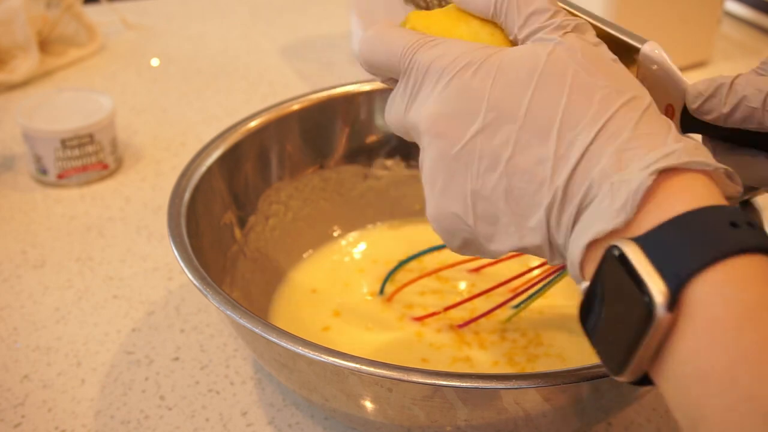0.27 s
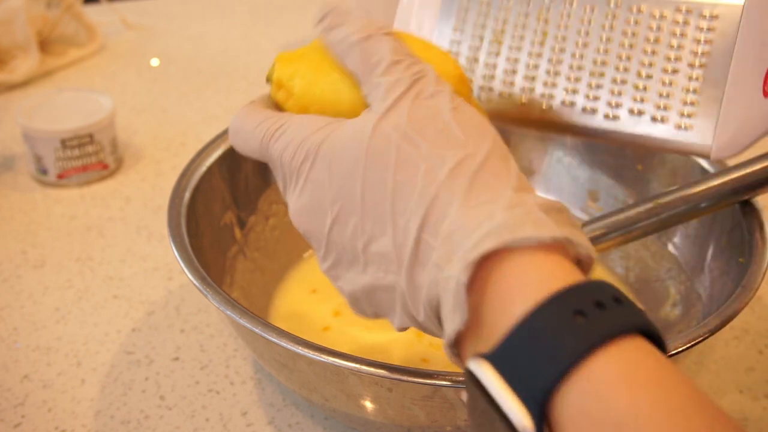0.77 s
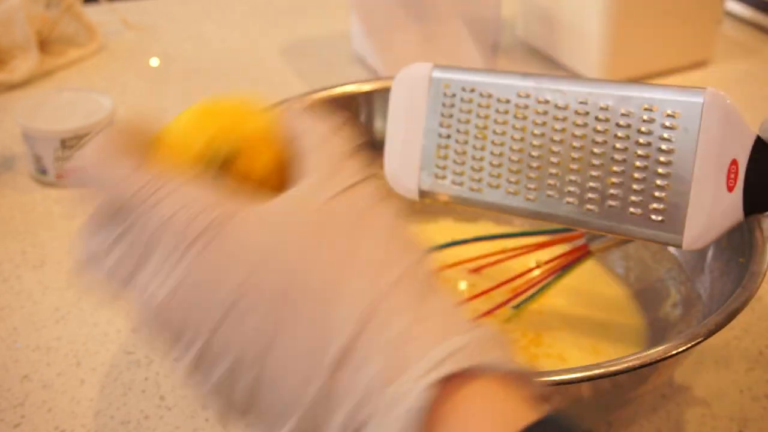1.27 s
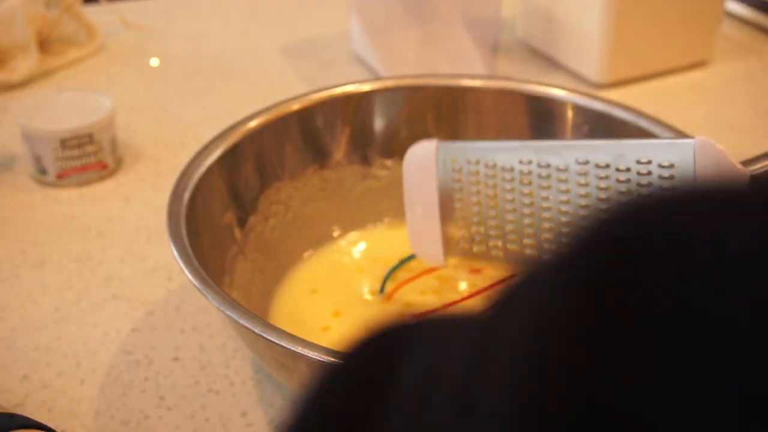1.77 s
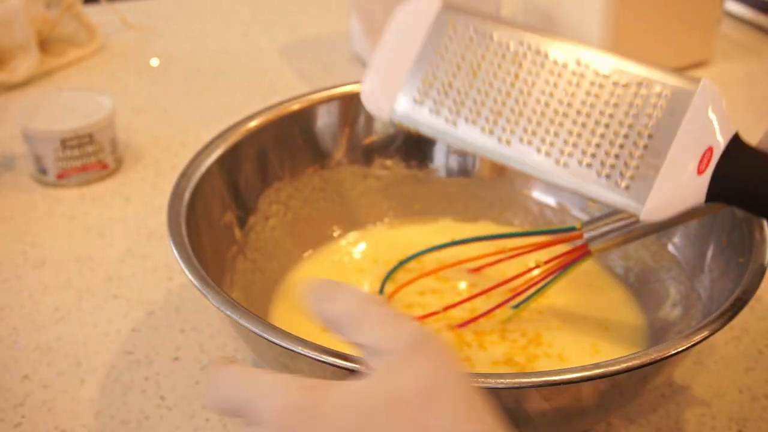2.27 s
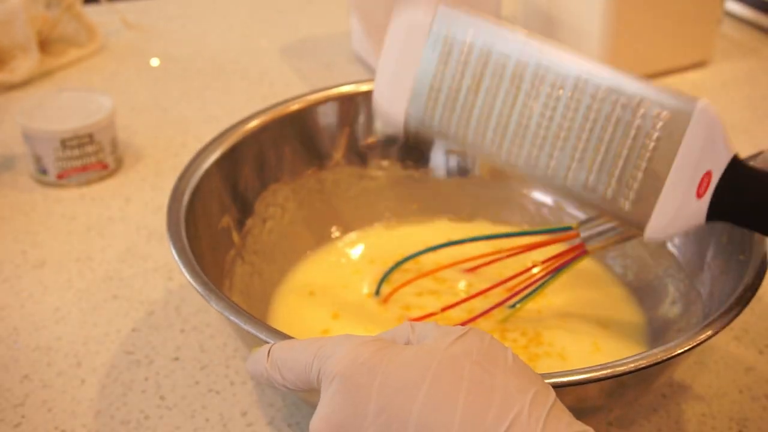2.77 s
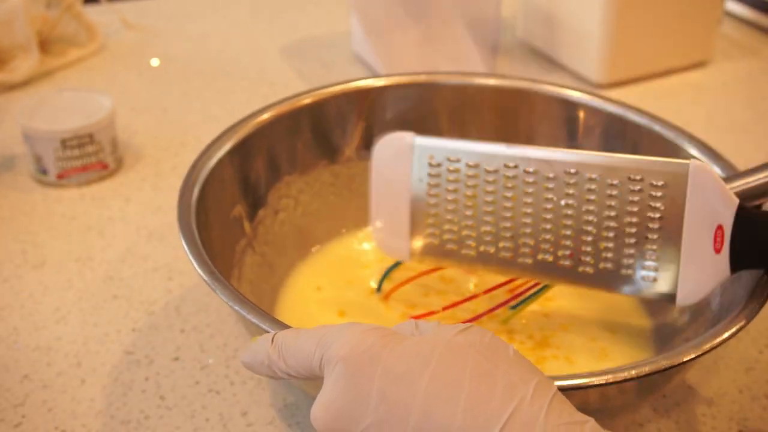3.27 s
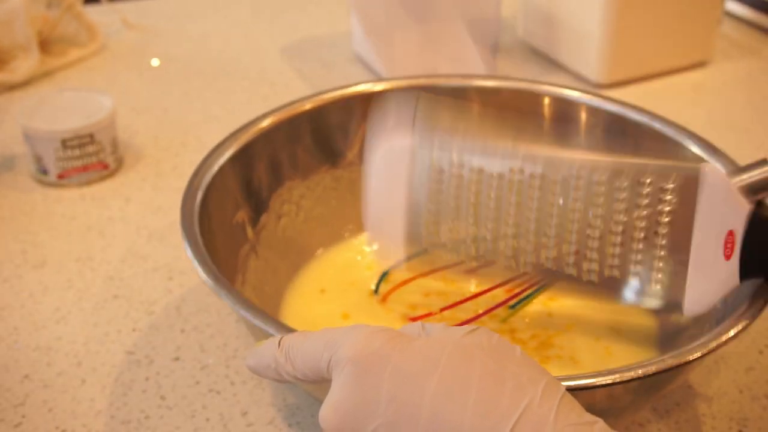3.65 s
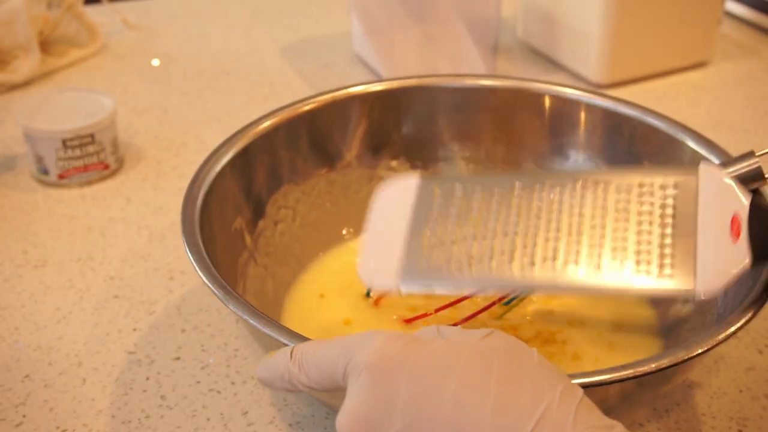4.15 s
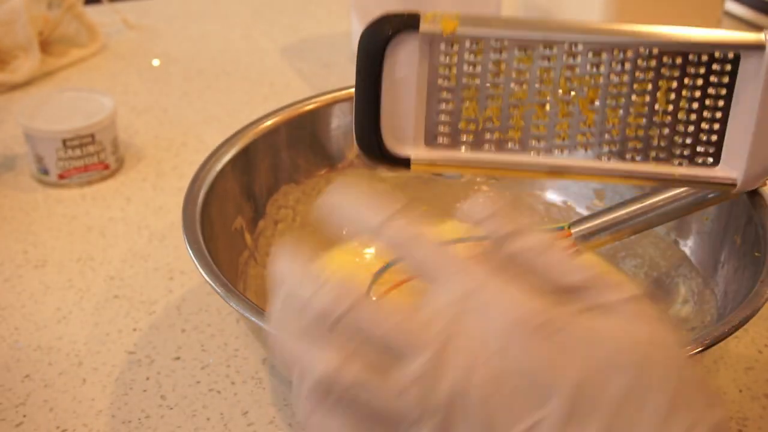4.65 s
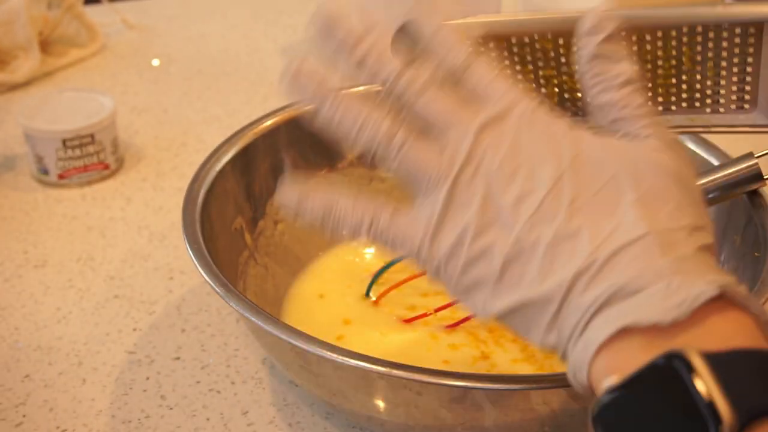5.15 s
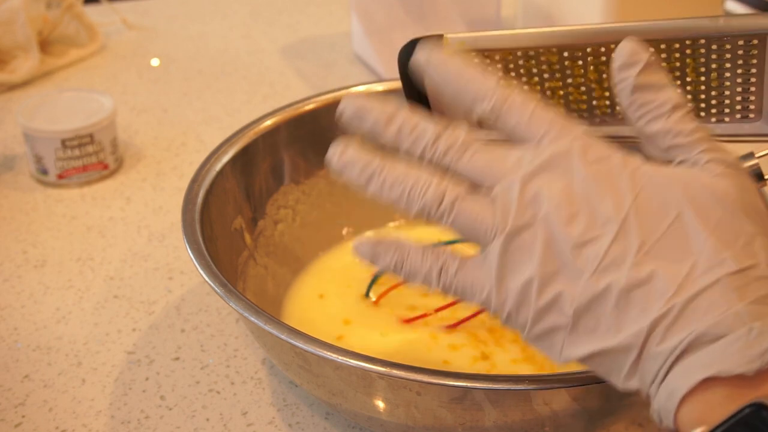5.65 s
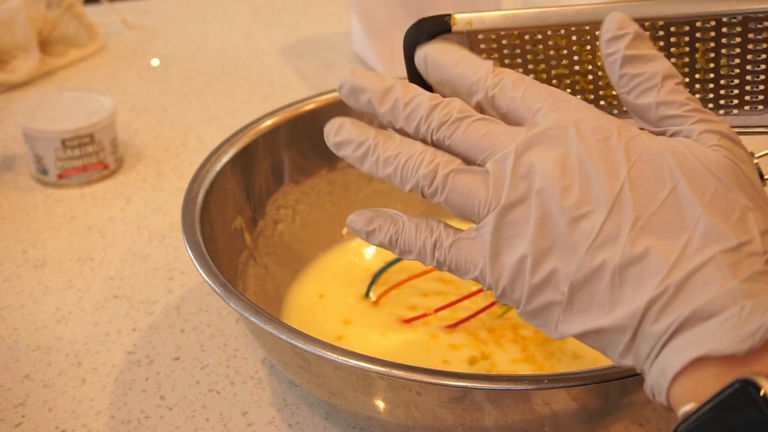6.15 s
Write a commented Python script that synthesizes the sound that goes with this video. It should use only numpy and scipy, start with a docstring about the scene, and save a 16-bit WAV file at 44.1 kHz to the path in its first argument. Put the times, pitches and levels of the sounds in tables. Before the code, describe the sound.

Four quick zesting rasps on a metal grater, soft glove rustles, then eight loud ringing knocks on a steel bowl with whisk clanks, then faint taps.

```python
"""Four quick rasps, light rustles and taps, eight ringing knocks with clanks, then more rustles and taps; room tone.
A lemon is rasped over a flat steel grater above a steel mixing bowl in a kitchen: bunched noise grains.
The grater scrapes along the rim, then knocks on it to shed the zest: force pulses excite bowl and worktop modes.
Each knock throws up the whisk lying in the bowl, which clanks as it lands: noise crack plus handle modes.
Gloved hands rustle and tap on a second grater: shaped noise through blade resonances."""
import sys
import numpy as np
from scipy import signal
from scipy.fft import rfft, irfft
from scipy.io import wavfile
from scipy.ndimage import uniform_filter1d

SR = 44100
rng = np.random.default_rng(int(sys.argv[2]) if len(sys.argv) > 2 else 0)


def master(y):
    """Save y as 16-bit WAV."""
    cut = np.clip(np.atleast_2d(y).T, -1, 1)
    pcm = np.round(cut * 32767)  # scale
    wavfile.write(sys.argv[1], SR, pcm.astype(np.int16))


N = 283122
TIME = np.arange(N) / SR
CUTOFF_HZ = 15900

# grater on the rim: peak t/s, relative level/dB, contact pitch f/Hz, whisk flight/s, bowl ring at landing/dB
KNOCKS = [(2.5316, -15, 634, 0.0075, 7), (2.6742, -12, 645, 0.011, 8), (3.089, -9, 553, 0.023, 8.5),
          (3.297, -6.5, 580, .0221, 3.5), (3.502, -7, 577, .0168, 5), (3.6989, -6, 592, .0185, -0.5),
          (3.8905, -4.5, 620, .0194, 5.5), (4.1084, -5, 665, 0.013, 4.5)]
# whisk handle modes: f/Hz, relative level/dB, t60/s
WHISK = [(1550, -12, .05), (2095, -9, .06), (2250, -10, .06), (2760, -9, .06), (3291, 0, .07),
         (3390, -9, .06), (4035, -12, .08), (4700, -16, .08), (6150, -16, .1)]
# glove friction spectrum: f/Hz, relative density/dB per Hz
GLOVE = [(1000, -6), (1800, -9.5), (2400, -5), (4000, -1.5), (5200, -1), (7200, -1.5), (12000, 0),
         (15800, -5.5)]
# diffuse sound: f/Hz, left-right correlation/1
LIKENESS = [(100, .997), (300, .95), (600, .76), (1000, .72), (2200, .55), (4500, .05), (14000, .25)]


def from_db(db):
    """dB to amplitude."""
    return 10 ** (np.asarray(db) / 20)


def at_hz(points, hz):
    """Read a table on a log-frequency axis."""
    table = np.array(points)
    return np.interp(np.log(np.maximum(hz, 1)), np.log(table[:, 0]), table[:, 1])


def coloured(x, spectrum):
    """Shape by a spectrum; white input keeps its power."""
    size = x.shape[-1]
    gain = from_db(at_hz(spectrum, np.fft.rfftfreq(size, 1 / SR)))
    return irfft(rfft(x) * gain / np.sqrt(np.mean(gain ** 2)), size)


def diffuse(size):
    """White stereo noise, alike in the bass and unlike in the treble."""
    mid, side = rfft(rng.standard_normal((2, size)))
    alike = np.clip(at_hz(LIKENESS, np.fft.rfftfreq(size, 1 / SR)), -.999, .999)
    mid = np.sqrt((1 + alike) / 2) * mid
    side = np.sqrt((1 - alike) / 2) * side
    return irfft(mid + side * [[1], [-1]], size)


def fade(t, t60):
    """Exponential decay, -60 dB at t60."""
    return np.exp(-np.log(1000) * t / t60)


def dying_noise(t60s, spectrum=None):
    """One second of diffuse noise, each frequency band dying at its own pace; mean channel energy 1."""
    noise = diffuse(SR)
    if spectrum is not None:
        noise = coloured(noise, spectrum)
    bins, hz, out = rfft(noise), np.fft.rfftfreq(SR, 1 / SR), 0
    edges_hz = np.r_[0, np.geomspace(125, SR / 2, 9)]
    for low, high in zip(edges_hz, edges_hz[1:]):
        band = irfft(bins * (hz >= low) * (hz < high), SR)
        out = out + band * fade(TIME[:SR], at_hz(t60s, (low + high) / 2))
    return out / np.sqrt(np.sum(out ** 2) / 2)


def add(track, s, sound):
    """Mix a sound in from time s on."""
    start = round(s * SR)
    track[..., start:start + sound.shape[-1]] += sound[..., :N - start]


def clicks(times_s, levels_db):
    """One-sample impulses."""
    track = np.zeros(N)
    track[np.round(np.asarray(times_s) * SR).astype(int)] = from_db(levels_db)
    return track


def ring(x, hz, t60):
    """A unit click sets a decaying sine of initial height 1 ringing."""
    r, w = fade(1 / SR, t60), 2 * np.pi * hz / SR
    return signal.lfilter([0, np.sin(w)], [1, -2 * r * np.cos(w), r * r], x + 1e-18)


def convolve(x, response):
    """Convolve per channel, cut to N samples."""
    return signal.fftconvolve(np.atleast_2d(x), np.atleast_2d(response), axes=-1)[:, :N]


def grains(per_s, spread_db, width):
    """Tiny snaps of uneven size and sign, each with its own stereo balance; rms 1."""
    sizes = from_db(spread_db * np.minimum(rng.exponential(1, N), 4)) * rng.choice([-1, 1], N)
    struck = rng.random(N) < per_s / SR
    balance = 1 + width * rng.standard_normal(N) * [[1], [-1]]
    snaps = sizes * struck * balance
    return snaps / snaps.std()


def rub(table, grit, rise_share, resonance_db, width_hz):
    """Each stroke swells and fades as a skewed bell; the place of contact picks a blade resonance."""
    # table: peak t/s, rise + fall sigma/s, relative level/dB, resonance f/Hz
    out, share = np.zeros((2, N)), np.clip(rise_share, .01, .99)
    for s, length_s, level_db, hz in table:
        near = np.abs(TIME - s) < .25
        t = TIME[near] - s
        sigma_s = length_s * np.where(t < 0, share, 1 - share)
        stroke = grit[:, near] * from_db(level_db) * np.exp(-.5 * (t / sigma_s) ** 2)
        b, a = signal.iirpeak(min(hz, CUTOFF_HZ), hz / width_hz, fs=SR)
        out[:, near] += stroke + from_db(resonance_db) * signal.lfilter(b, a, stroke)
    return out


def room_tone(level_db=-54):
    """Steady diffuse noise, strongest in the bass."""
    # f/Hz, relative density/dB per Hz
    air_spectrum = [(15, -13), (25, -4), (59, -7), (76, -5), (107, -7), (174, 0.5), (205, -8), (316, -2),
                    (342, -5), (654, -14), (834, -18), (2660, -25.5), (3300, -22.5), (4100, -23),
                    (15800, -25.5)]
    return from_db(level_db) * coloured(diffuse(N), air_spectrum)


def zesting(rise_share=.6):
    """Teeth tear the peel in thousands of small snaps, bunched as each row of teeth bites."""
    # lemon strokes: peak t/s, rise + fall sigma/s, relative level/dB, blade resonance f/Hz
    strokes = [(.008, 0.053, -31, 2290), (.140, 0.065, -30.5, 2750), (.283, 0.049, -30, 2170),
               (.442, 0.091, -30, 3400)]
    # f/Hz, relative density/dB per Hz
    rasp_spectrum = [(200, -17), (420, -16), (800, -12), (1050, -6.5), (1500, -10.5), (2050, -1.5),
                     (3500, -1.5), (4800, -5.5), (6500, -5), (9400, -6.5), (10500, -4), (12700, -3.5),
                     (15800, -9.5)]
    bites = uniform_filter1d(rng.standard_normal(N), size=130)
    bite_gain = from_db(1.35 * bites / bites.std())
    grit = coloured(grains(per_s=6000, spread_db=0.5, width=0.5) * bite_gain, rasp_spectrum)
    return from_db(-0.5) * rub(strokes, grit, rise_share, resonance_db=-5.5, width_hz=290)


def reverberation(source):
    """The kitchen returns a mono sum as a diffuse tail that builds up and dies, the treble faster."""
    # f/Hz, t60/s
    room_t60 = [(100, 0.99), (1000, 0.7), (4000, 0.56), (14000, 0.42)]
    tail = dying_noise(room_t60) * (1 - fade(TIME[:SR], t60=0.11))
    return convolve(source.mean(axis=0), tail)


def hands(crinkles_per_s=49, crinkle_db=-7, rise_share=0.2, arch=0.45):
    """Gloves slide and crinkle over the grater, whose blade rings faintly; speed sets the level."""
    # slides: start t/s, length/s, relative hiss level/dB, relative blade level/dB
    glove_moves = [(.55, 0.66, -56, -68.5), (1.28, 0.66, -55, -61), (1.9, 0.86, -53, -67.5),
                   (4.513, 0.52, -50, -67)]
    grit = coloured(grains(per_s=5500, spread_db=4.0, width=1.0), GLOVE)
    snap_t = TIME[:SR // 100]
    snap = rng.standard_normal(SR // 100) * fade(snap_t, t60=0.0094)
    crinkles = coloured(convolve(grains(crinkles_per_s, spread_db=2.5, width=0.8), snap), GLOVE)
    blade = signal.lfilter(*signal.iirpeak(2350, 7.0, fs=SR), grit)
    blade = blade / blade.std()
    glove = grit + from_db(crinkle_db) * crinkles / crinkles.std()
    out = np.zeros((2, N))
    for s, length_s, hiss_db, blade_db in glove_moves:
        # lower arch: more even speed
        speed = np.interp((TIME - s) / length_s, [0, rise_share, 1], [0, 1, 0]) ** arch
        out += speed * (from_db(hiss_db) * glove + from_db(blade_db) * blade)
    return from_db(-1) * out


def fingers(wipe_rise_share=0.52, flick_rise_share=0.064, tap_rise_share=0.35, flick_hz=4500, tap_s=.003):
    """Fingers wipe, flick zest off and tap the grater: friction noise in short strokes of differing skew."""
    # peak t/s, rise + fall sigma/s, relative level/dB, resonance f/Hz
    wipe_table = [(1.39, .06, -55.5, 2500), (2.295, .034, -54, 7940), (5.16, 0.08, -53, 12000),
                  (5.208, 0.019, -54, 4400)]
    # peak t/s, rise + fall sigma/s, relative level/dB
    flick_table = [(5.493, 0.023, -52.5), (5.879, .029, -44)]
    # peak t/s, relative level/dB, resonance f/Hz
    tap_table = [(0.965, -52.5, 4470), (1.768, -50, 4800), (4.678, -47, 4800), (4.821, -49, 9100),
                 (4.898, -51.5, 6760), (5.004, -53, 6000), (5.699, -52, 3930), (6.369, -50, 4060)]
    friction = coloured(diffuse(N), GLOVE)
    flick_strokes = [(*flick, flick_hz) for flick in flick_table]
    tap_strokes = [(s, tap_s, level_db, hz) for s, level_db, hz in tap_table]
    wipes = rub(wipe_table, friction, wipe_rise_share, resonance_db=1.0, width_hz=3100)
    flicks = rub(flick_strokes, friction, flick_rise_share, resonance_db=3, width_hz=1100)
    taps = rub(tap_strokes, friction, tap_rise_share, resonance_db=5, width_hz=1900)
    return from_db(1.0) * (wipes + flicks + taps)


def bumps():
    """Dull handling bumps, short low rings, reach the microphone through its stand, not the room."""
    # t/s, level/dB
    bump_table = [(1.9088, -34.5), (1.9194, -36.5), (1.9611, -35.5)]
    return ring(clicks(*np.transpose(bump_table)), hz=97, t60=0.085)


def slide(length_s=0.067, final_db=-41.5, swell_db=11.5):
    """The grater scrapes ever harder along the rim up to the first knock; the whisk handle sings."""
    friction = diffuse(N)
    singing = sum(from_db(db) * ring(friction, hz, t60) for hz, db, t60 in WHISK)
    to_go = (KNOCKS[0][0] - TIME) / length_s
    level = from_db(final_db - swell_db * np.clip(to_go, 0, 1))
    return singing / singing.std() * level * (to_go > 0) * (to_go < 1)


def knocks(buzz_db=-25, buzz_t60=.05, tick_lag_s=0.0061, tick_db=-23, cushion_hz=1500):
    """A cushioned blow radiates its bell-shaped force's second derivative; the thin blade buzzes and ticks."""
    # f/Hz, relative density/dB per Hz
    buzz_spectrum = [(500, -37), (2000, -18), (3300, -16.0), (4200, -16.5), (15000, -27)]
    out, thuds, t = np.zeros((2, N)), np.zeros(N), TIME[:SR // 20]
    for s, level_db, hz, _, _ in KNOCKS:
        u = (np.pi * hz * (TIME - s)) ** 2
        thuds += from_db(level_db) * (2 * u - 1) * np.exp(-u)
        buzz = coloured(diffuse(len(t)), buzz_spectrum) * fade(t, buzz_t60)
        tick = diffuse(len(t)) * fade(t, t60=0.035)
        add(out, s, from_db(level_db + buzz_db) * buzz)
        add(out, s + tick_lag_s, from_db(level_db + tick_db) * tick)
    return out + signal.sosfilt(signal.butter(3, cushion_hz, fs=SR, output="sos"), thuds)


def pushes(push_db=-26.5, push_hz=584):
    """Momentum of each knock in dB: a duller contact lasts longer and pushes more."""
    _, level_db, hz, _, _ = np.transpose(KNOCKS)
    return level_db + push_db - 60 * np.log10(hz / push_hz)


def swing(swing_db=28.0, landed_t60=.011, build_t60=0.0262, lag_s=0.00018):
    """A knock throws the whisk up; the bowl swings freely until the whisk lands and damps it."""
    # free bowl modes: f/Hz, relative level/dB, t60/s
    swing_modes = [(154.5, -25.5, 0.164), (272, -13.5, 0.04), (361, -29.5, 0.05), (484, -5.5, 0.028),
                   (644.5, -10.5, 0.093), (742, -21, 0.12)]
    out, t, free = np.zeros((2, N)), TIME[:SR // 10], 0
    for k, (hz, db, t60) in enumerate(swing_modes):
        lag = (-1) ** k * lag_s * np.array([[1], [-1]])   # alternate modes lead on opposite sides
        free = free - from_db(db) * np.cos(2 * np.pi * hz * (t + lag)) * fade(t, t60)
    free = free * (1 - fade(t, build_t60)) ** 2
    for (s, _, _, flight_s, _), push_db in zip(KNOCKS, pushes()):
        damping = fade(np.maximum(t - flight_s, 0), landed_t60)
        add(out, s, from_db(push_db + swing_db) * free * damping)
    return out


def counter():
    """Knocks set the worktop booming; its close modes start in opposition, so the boom swells after each blow."""
    # worktop modes: f/Hz, relative level/dB, t60/s
    worktop_modes = [(64.8, 6, 0.61), (71.5, 6.5, 0.72), (90.5, 5, 0.5)]
    push = clicks(np.array(KNOCKS)[:, 0], pushes())
    boom = 0
    for k, (hz, db, t60) in enumerate(worktop_modes):
        boom = boom + (-1) ** k * from_db(db) * ring(push, hz, t60)
    return signal.sosfilt(signal.butter(2, 45, "high", fs=SR, output="sos"), boom)


def whisk_falls(landing_db=-13.5, usual_flight_s=0.019, db_per_doubling=3, rebound_ring_db=4):
    """The whisk lands after every knock, harder after a longer flight, and rebounds after the later ones."""
    # t/s, relative strength/dB
    rebounds = [(3.171, -18), (3.386, -14), (3.5895, -15.5), (3.787, -17), (3.986, -24), (4.1934, -30)]
    falls = []   # t/s, strength/dB, bowl ring/dB
    for s, _, _, flight_s, ring_db in KNOCKS:
        strength_db = landing_db + db_per_doubling * np.log2(flight_s / usual_flight_s)
        falls.append((s + flight_s, strength_db, ring_db))
    return np.array(falls + [(s, level_db, rebound_ring_db) for s, level_db in rebounds])


def bowl(soft_hz=900, knock_db=15, clank_db=18, scatter_db=4.0, split=0.003):
    """Soft knocks favour low modes, hard clanks high ones; a round bowl's modes come in close, beating pairs."""
    # f/Hz, relative level/dB
    bowl_modes = [(129, -46.5), (148, -53), (252, -53.5), (281, -48), (386, -53.5), (506, -55.5),
                  (642, -60), (760, -54), (976, -48.5), (1040, -57.5), (1164, -61), (1549, -52.5),
                  (1698, -62.5), (1910, -45), (1965, -57), (2095, -41.5), (2239, -40.5), (2390, -45.5),
                  (2536, -50), (2650, -43.5), (2709, -43), (2784, -59.5), (3291, -58), (3828, -70.5),
                  (4037, -60.5), (4694, -60), (5270, -61), (5970, -63.5), (6165, -75), (6438, -63.5)]
    # f/Hz, t60/s
    bowl_t60 = [(130, 0.58), (500, 1), (1200, 0.66), (2200, 0.48), (3300, 0.73), (6400, 0.34)]
    knock_s, knock_level, *_ = np.transpose(KNOCKS)
    clank_s, clank_level, ring_db = whisk_falls().T
    blow_s = np.r_[knock_s, clank_s]
    out = np.zeros((2, N))
    for k, (hz, mode_db) in enumerate(bowl_modes):
        hardness_db = 40 * np.log10(hz / soft_hz)
        knock_levels = knock_level + knock_db - max(hardness_db, 0)
        clank_levels = clank_level + ring_db + clank_db + min(hardness_db, 0)
        levels = np.r_[knock_levels, clank_levels]
        lean = np.sqrt(np.clip(1 - at_hz(LIKENESS, hz), 0, 1)) / 2
        for twin in (-1, 1):
            blows = clicks(blow_s, levels + mode_db + scatter_db * rng.standard_normal(len(levels)))
            tone = ring(blows, hz * (1 + twin * split / 2), at_hz(bowl_t60, hz))
            out += (-1) ** k * tone / 2 * (1 + twin * lean * np.array([[1], [-1]]))
    return out


def wash(soft_hz=1000, hard_hz=700, knock_db=15.5, clank_db=11):
    """The bowl's many weaker modes blur into a dying wash, darker from knocks than from clanks."""
    # f/Hz, relative density/dB per Hz
    wash_spectrum = [(100, -4), (280, -1.5), (700, -12.5), (1050, 2.5), (1300, -2.5), (1550, -5.5),
                     (1800, -8.5), (2200, -0.5), (2900, -10), (3700, -9), (5200, -17), (6500, -12),
                     (7500, -20), (15500, -30)]
    # f/Hz, t60/s
    wash_t60 = [(100, 0.74), (350, 0.81), (920, 0.87), (2400, 0.74), (6400, 1), (14000, 0.18)]
    knock_s, knock_level, *_ = np.transpose(KNOCKS)
    clank_s, clank_level, ring_db = whisk_falls().T
    soft = clicks(knock_s, knock_level + knock_db)
    soft = signal.sosfilt(signal.butter(2, soft_hz, fs=SR, output="sos"), soft)
    hard = clicks(clank_s, clank_level + ring_db + clank_db)
    hard = signal.sosfilt(signal.butter(1, hard_hz, "high", fs=SR, output="sos"), hard)
    tail = dying_noise(wash_t60, wash_spectrum) * (1 - fade(TIME[:SR], t60=0.11))
    return convolve(soft + hard, tail)


def clanks(crack_db=-1.5, crack_t60=0.044, whisk_db=-3.0):
    """Steel on steel: a noise crack and the whisk handle's short ring, a little different each time."""
    # f/Hz, relative density/dB per Hz
    crack_spectrum = [(300, -5), (1000, -23.5), (1500, -0.5), (2400, -1.5), (3400, -2.5), (3900, -18),
                      (5000, -14.5), (6500, -14.5), (7400, -27.5), (9000, -18.5), (10500, -28),
                      (15500, -31)]
    out, t = np.zeros((2, N)), TIME[:SR // 8]
    hz, mode_db, t60 = np.transpose(WHISK)[:, :, None]
    lag_rad = .47 * rng.standard_normal(hz.shape) * np.array([1, -1])[:, None, None]
    for s, level_db, _ in whisk_falls():
        crack = from_db(crack_db) * coloured(diffuse(len(t)), crack_spectrum) * fade(t, crack_t60)
        strength = from_db(whisk_db + mode_db + 0.84 * rng.standard_normal(hz.shape))
        phase_rad = 2 * np.pi * (hz * t + rng.random(hz.shape)) + lag_rad
        tone = strength * np.sin(phase_rad) * fade(t, t60)
        add(out, s, from_db(level_db) * (crack + tone.sum(axis=1)))
    return out


def scene():
    """Sum direct sounds, reverberation and room tone."""
    rubbing = zesting() + hands() + fingers() + slide()
    knocking = knocks() + swing()
    clanking = clanks()
    into_room = from_db(-5.5) * rubbing + from_db(-4.5) * knocking + from_db(-0.5) * clanking
    resonances = bowl() + wash() + counter() + bumps()
    return rubbing + knocking + clanking + resonances + reverberation(into_room) + room_tone()


def record(dry):
    """Cut the top steeply."""
    return signal.sosfilt(signal.ellip(10, .1, 80, CUTOFF_HZ, fs=SR, output="sos"), dry)


dry = scene()
out = record(dry)
master(out)
```